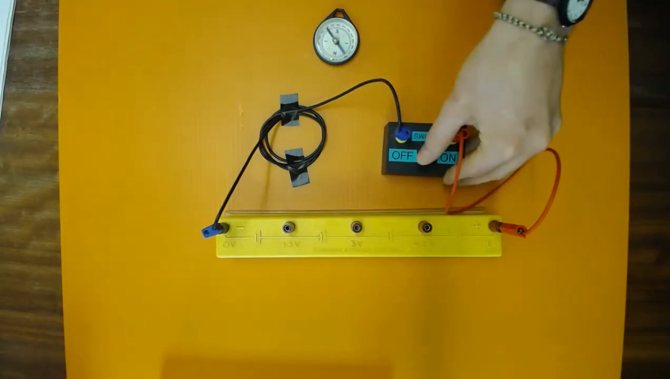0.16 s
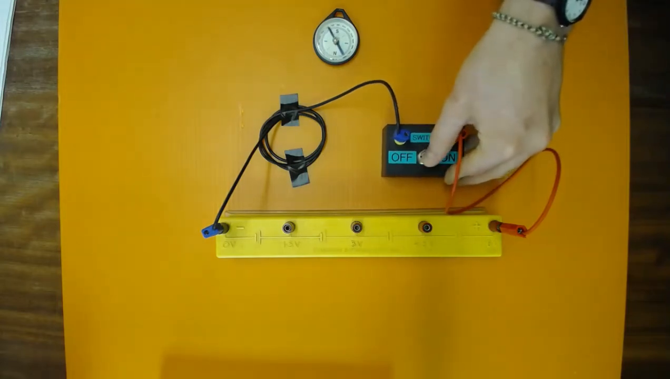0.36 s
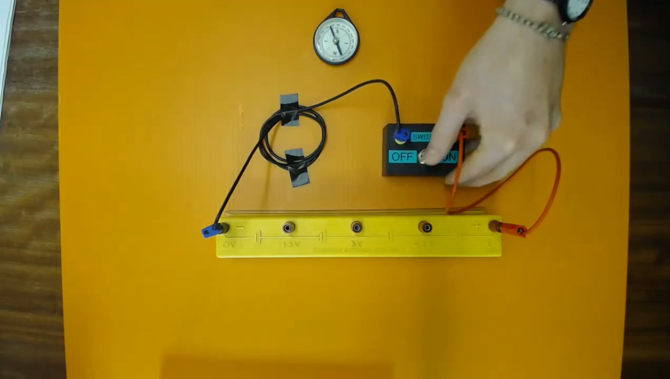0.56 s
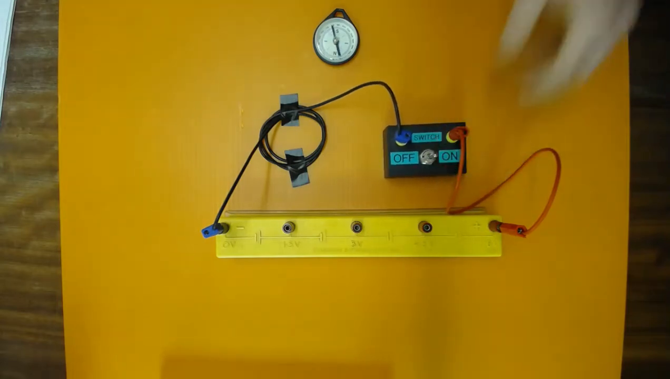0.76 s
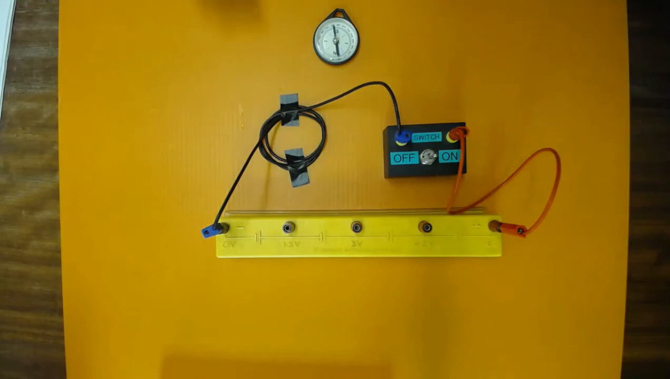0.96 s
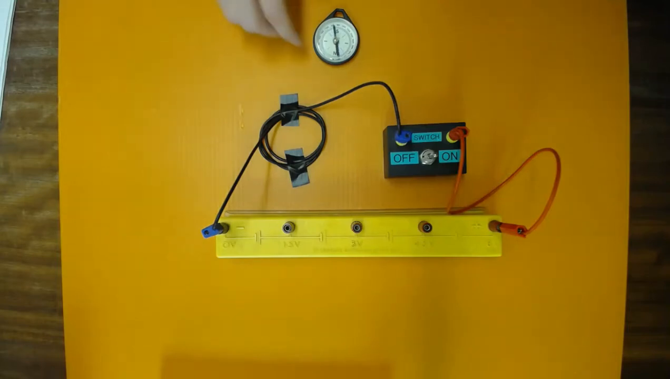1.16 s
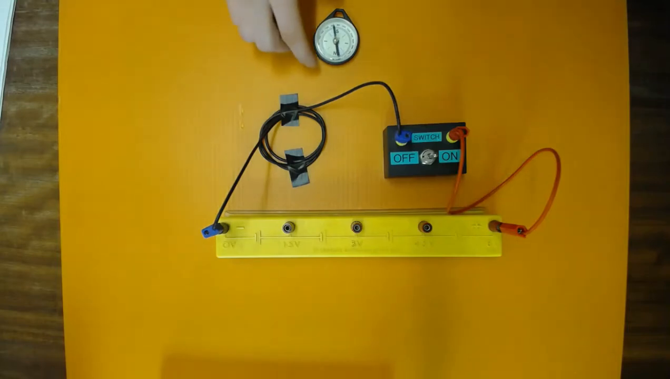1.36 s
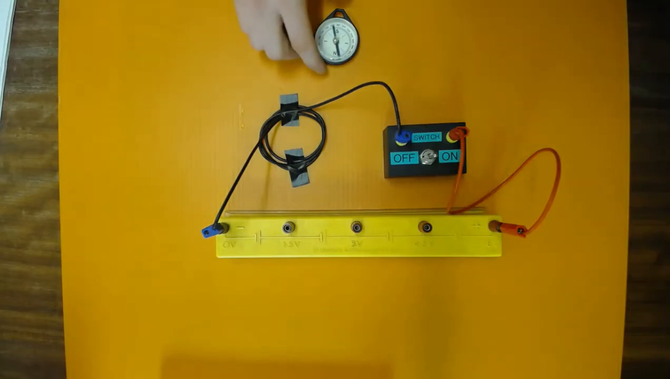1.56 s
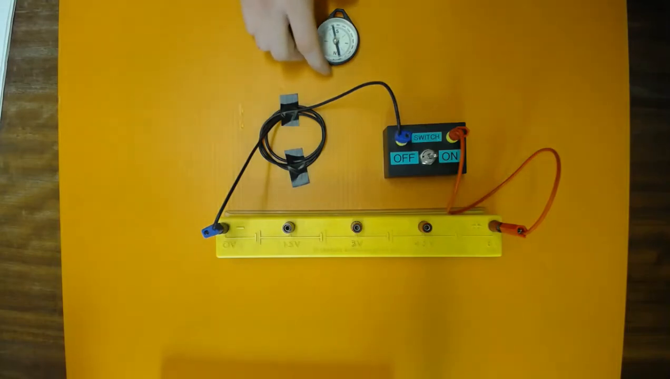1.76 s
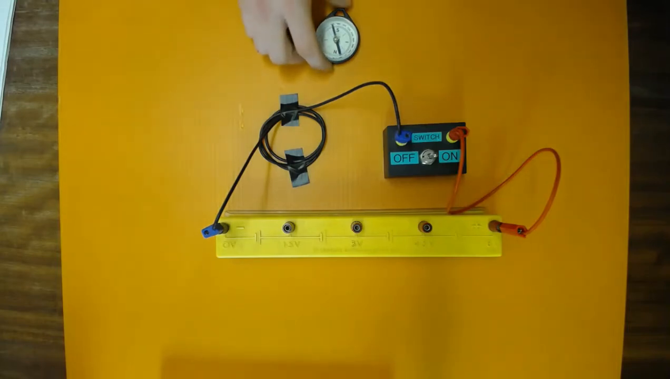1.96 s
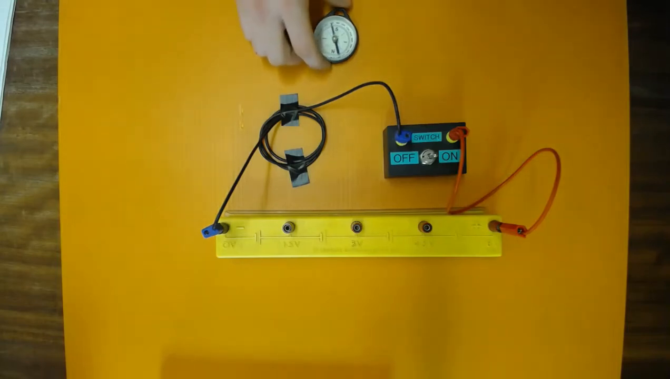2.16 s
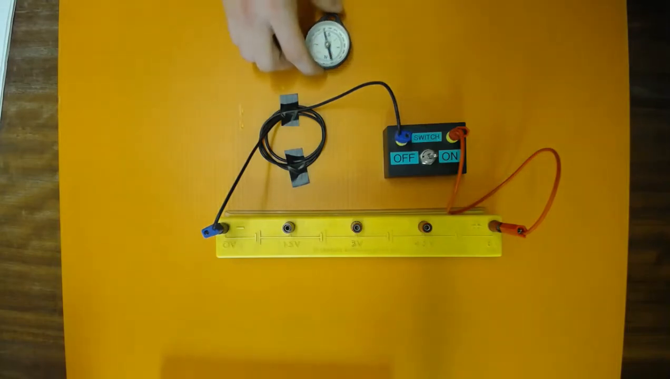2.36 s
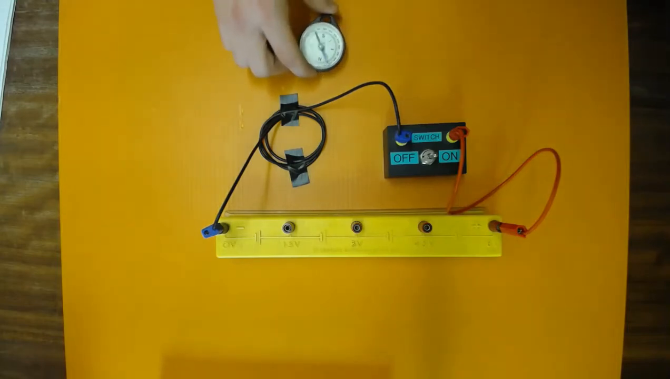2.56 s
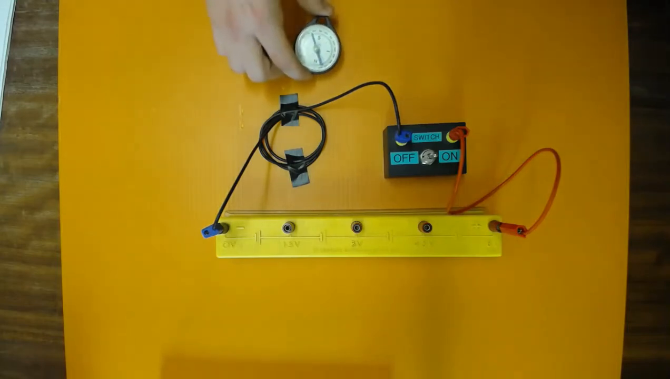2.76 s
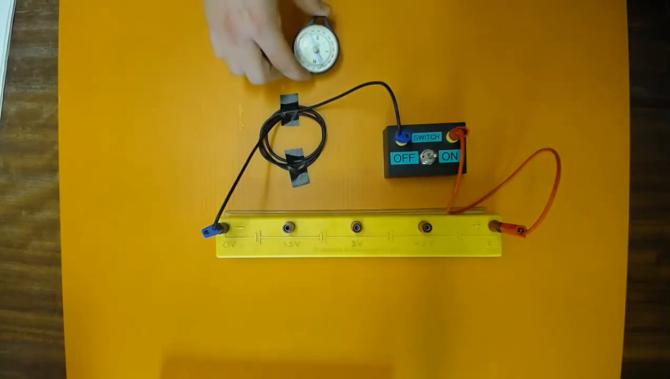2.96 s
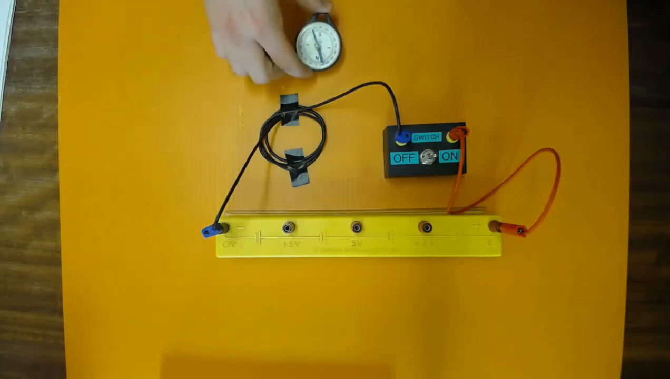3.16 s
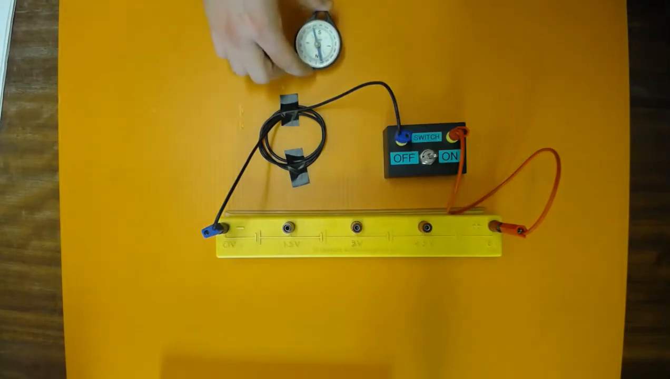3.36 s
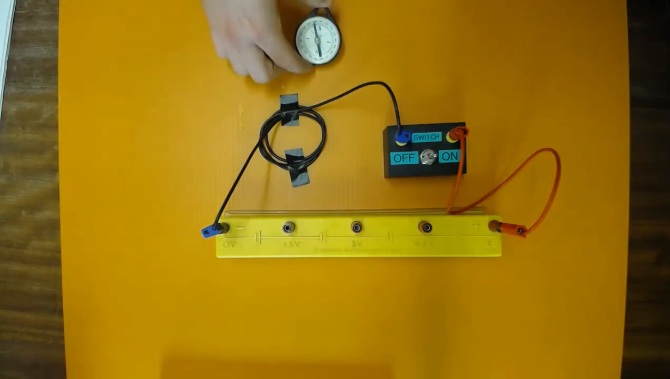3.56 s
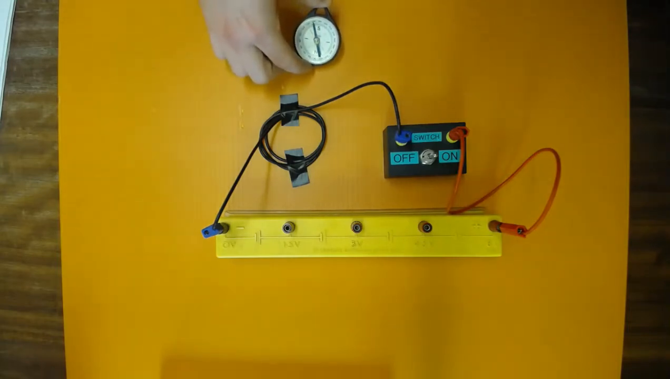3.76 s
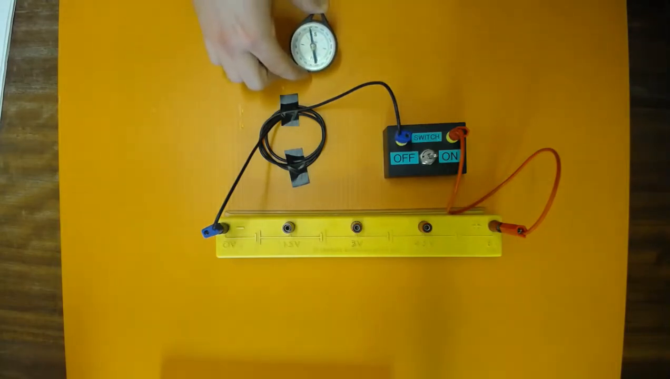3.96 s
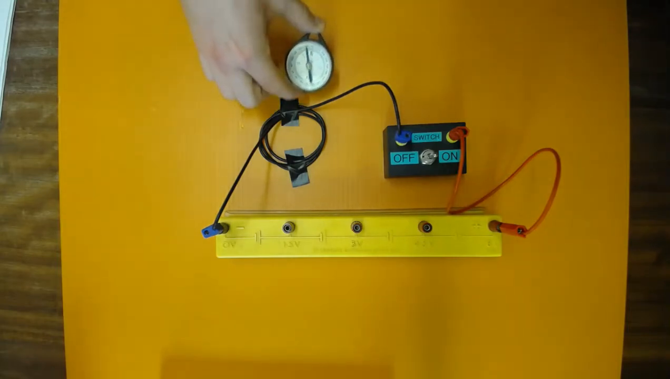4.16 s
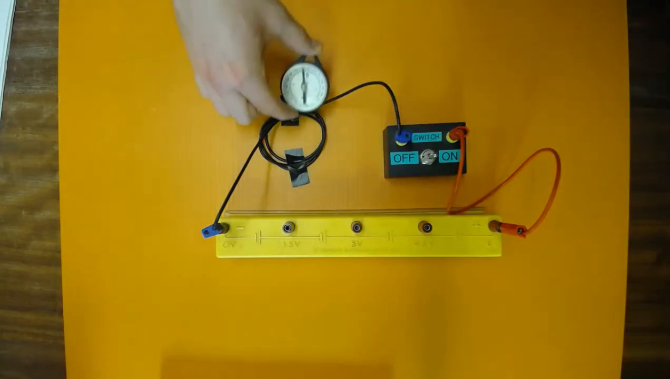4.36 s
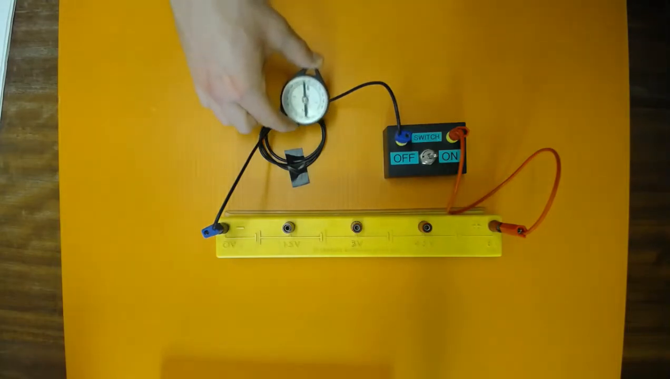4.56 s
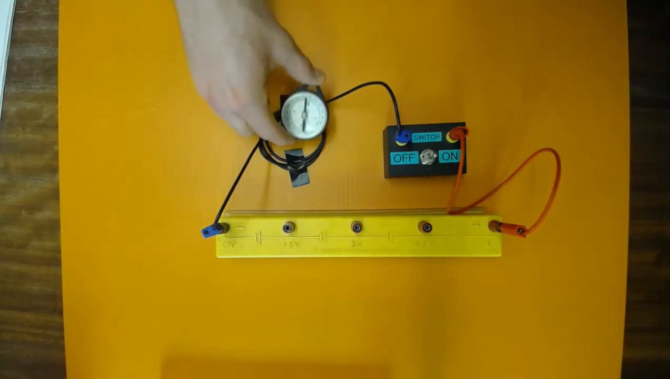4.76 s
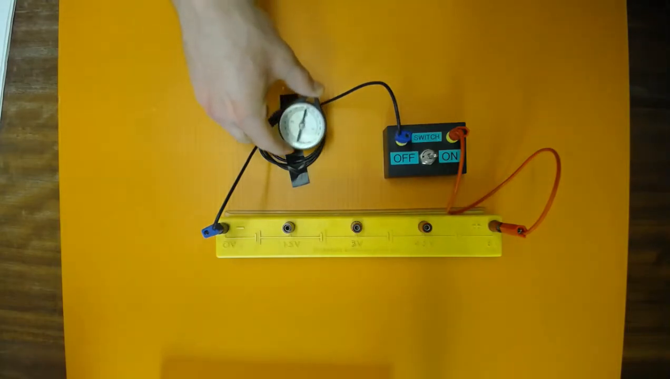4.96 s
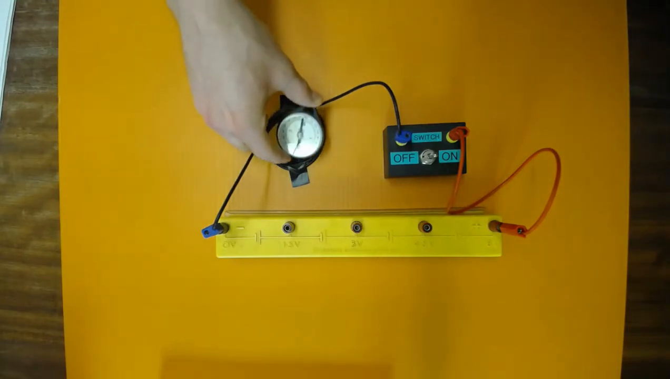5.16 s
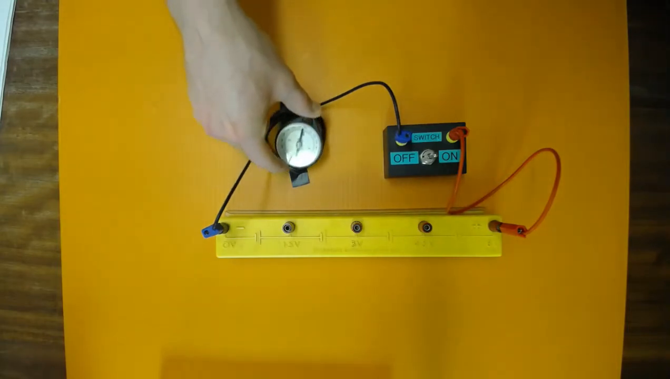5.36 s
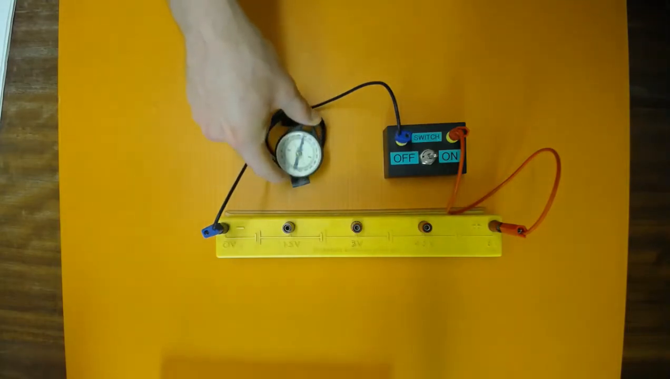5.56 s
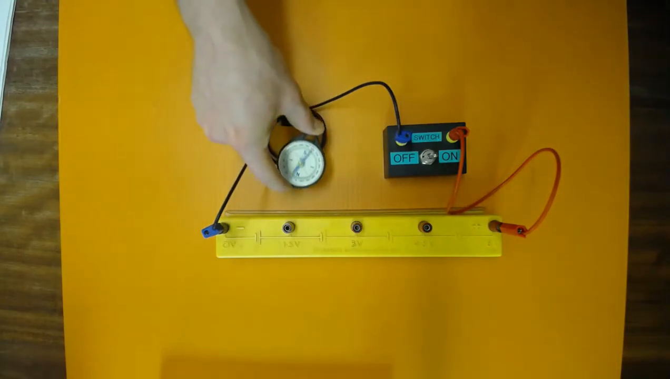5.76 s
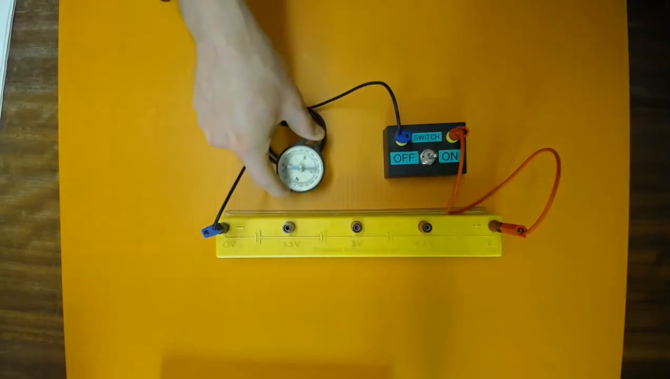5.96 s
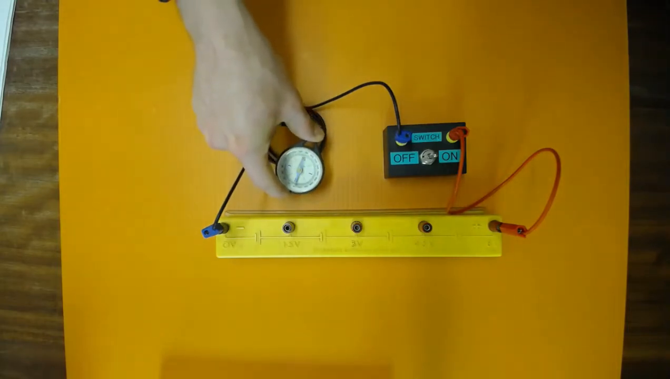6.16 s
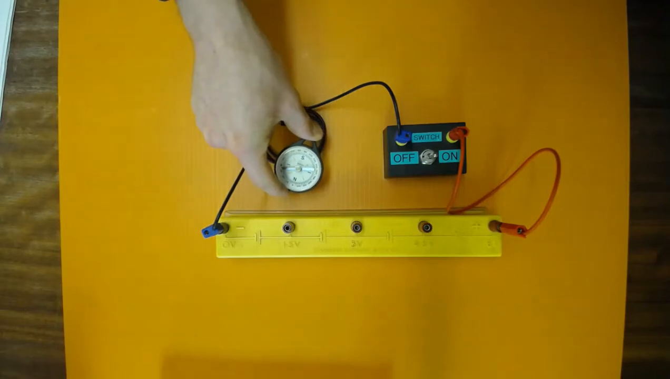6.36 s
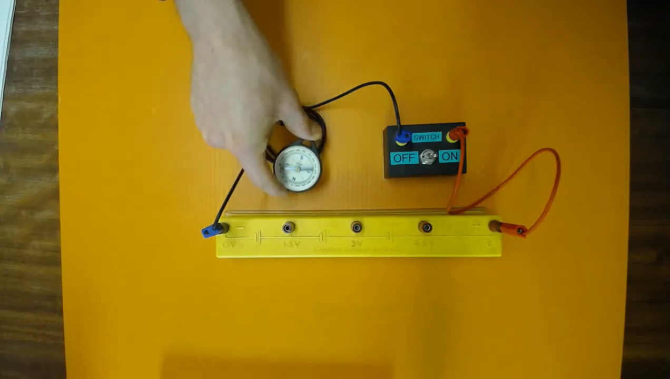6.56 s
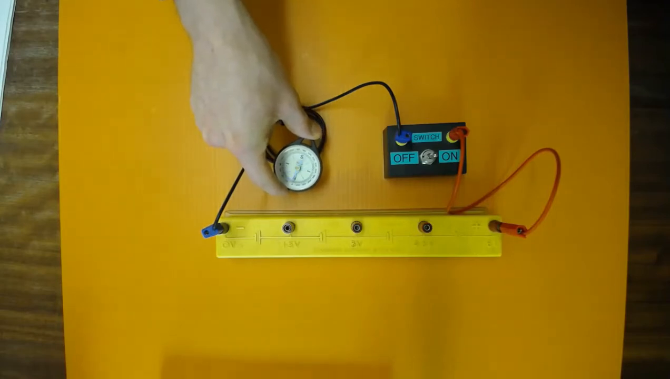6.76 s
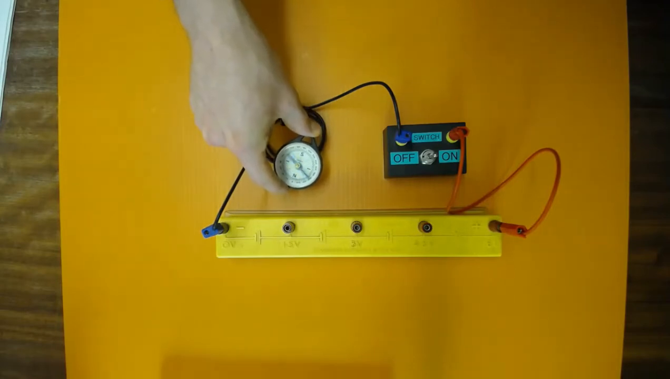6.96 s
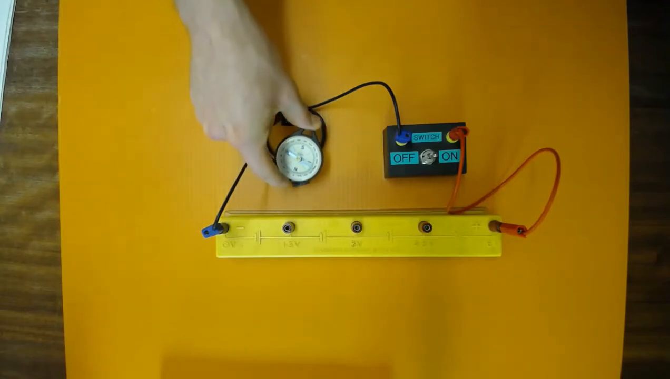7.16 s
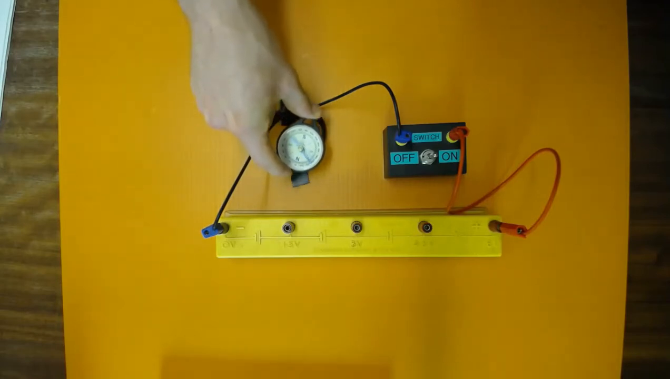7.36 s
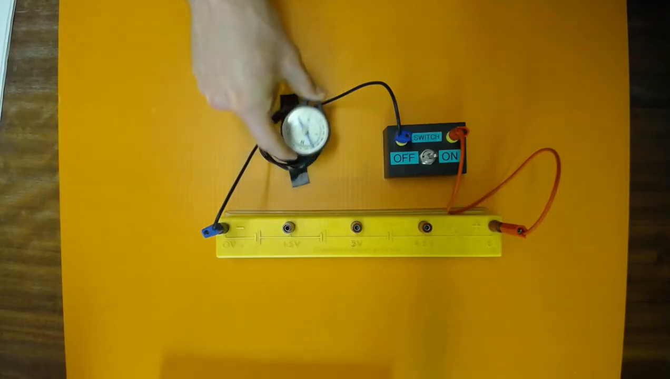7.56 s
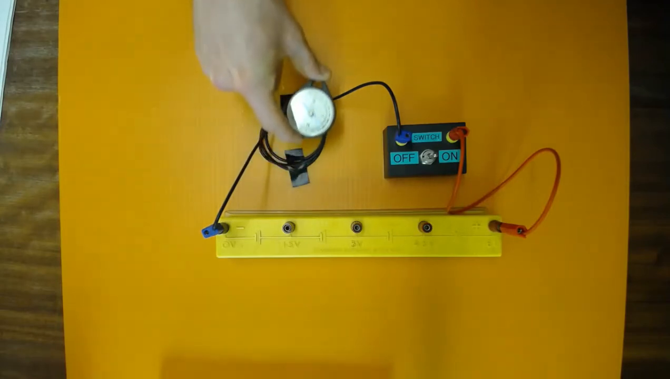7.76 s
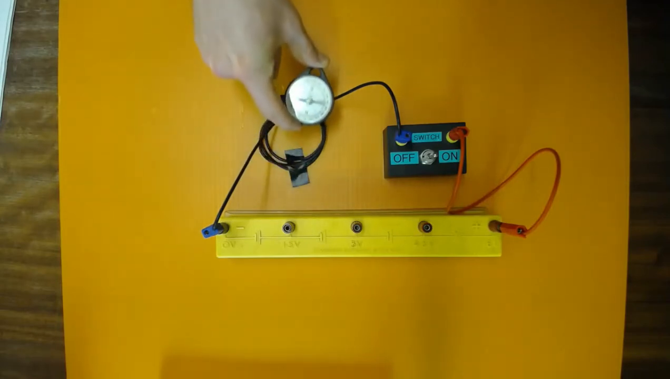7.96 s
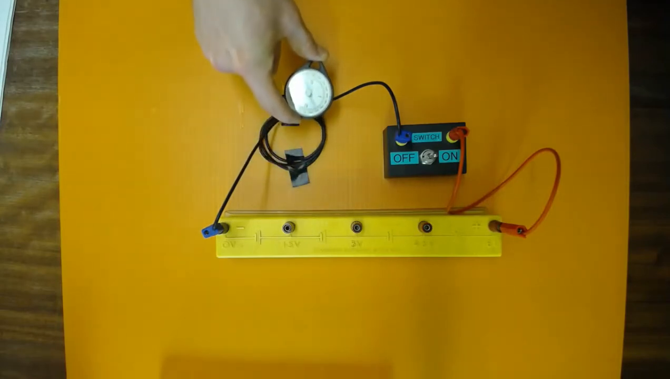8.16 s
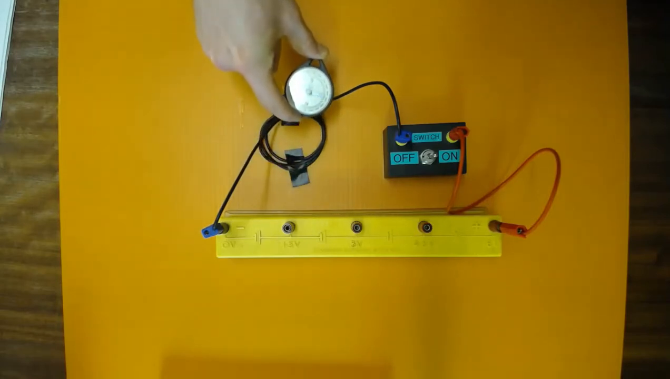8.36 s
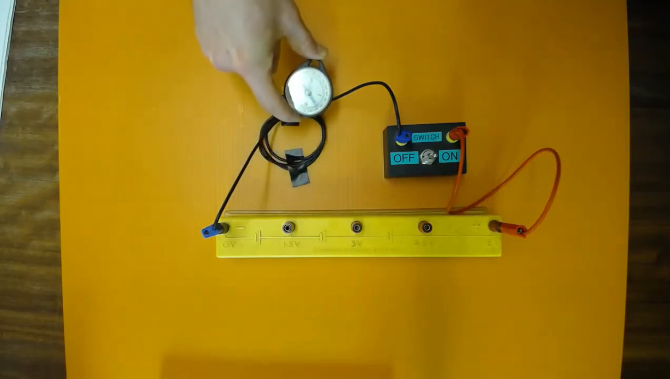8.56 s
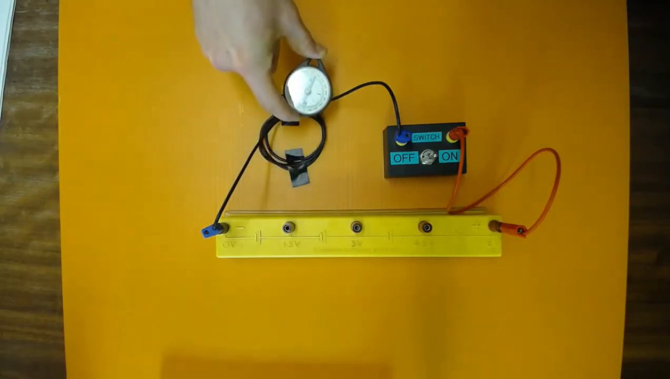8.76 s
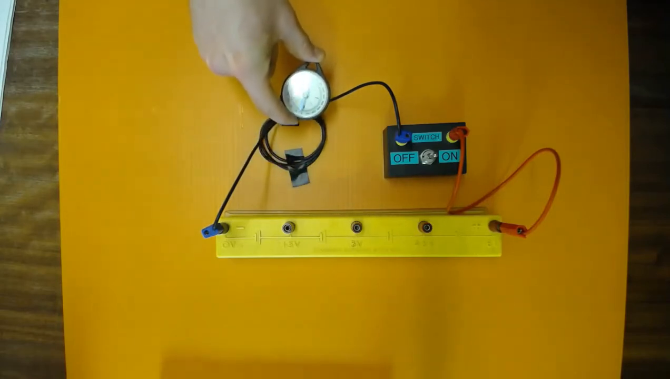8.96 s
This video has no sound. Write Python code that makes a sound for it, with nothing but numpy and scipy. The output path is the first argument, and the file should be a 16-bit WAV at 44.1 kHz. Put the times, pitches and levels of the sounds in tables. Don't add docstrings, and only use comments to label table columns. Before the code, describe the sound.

A plastic toggle switch snaps loudly on a table, then small, sparse metallic ticks from a handled compass over quiet fan hum and soft table thumps.

```python
import sys
import numpy as np
from scipy import signal
from scipy.fft import rfft, irfft, next_fast_len
from scipy.io import wavfile
from scipy.ndimage import map_coordinates

SR = 44100
rng = np.random.default_rng(int(sys.argv[2]) if len(sys.argv) > 2 else 0)


def int16_out(signal):
    q = np.round(np.clip(np.atleast_2d(signal).T, -1, 1) * 32767)
    wavfile.write(sys.argv[1], SR, q.astype(np.int16))


def boost_factor(decibels):
    exponent = np.asarray(decibels, float) / 20
    return 10 ** exponent


N = 397341

# (frequency [Hz], level [dB per Hz])
AIR = [(20, -12.5), (60, -15), (110, -12), (150, -14), (230, -17), (350, -14), (500, -13.5), (800, -15.5),
       (1100, -18), (1400, -20.5), (1700, -28.5), (3000, -34), (6000, -41.5), (16000, -51.5)]
# (frequency [Hz], width [Hz], level over the rush [dB])
DUCT = [(400, 30, -0.5), (680, 69.98, 10.5), (1015.5, 35, 7), (2065, 54, 8), (2871.5, 240, 4),
        (7400, 43, 6), (8170, 150, 4)]
# (frequency [Hz], likeness [-1 to 1])
AIR_LIKENESS = [(60, 0.81), (130, 1), (290, 0.75), (640, 0.91), (1410, 0.23), (3100, -0.37), (6820, -0.35),
                (15000, 0.0003)]
# (frequency [Hz], left over right [dB])
AIR_PAN = [(25, 0.82), (60, 2), (110, -3.5), (200, 5.5), (380, 1.5), (700, 1.5), (1290, 0), (2380, 2),
           (4400, 0), (8120, 3.5), (15000, -2)]
# (frequency [Hz], level [dB rms])
HUM = [(301, -73), (398, -78.5), (495, -78), (592, -81), (732, -79), (1012, -78.5)]
# (frequency [Hz], width [Hz], level [dB])
LENS = [(7500, 300, 0.0011), (8150, 400, 0.00014)]
# (time [s], level [dB], build-up [s])
SHOVES = [(.06, -58, 0.06), (.215, -59, 0.021), (.87, -66, 0.051), (.98, -61.5, 0.057), (1.17, -65, 0.07),
          (1.4, -67.5, 0.054), (1.6, -65.5, 0.042), (2.11, -64, 0.047), (2.24, -58.5, 0.033),
          (2.45, -56.5, 0.089), (2.75, -63, 0.088), (3.09, -68.5, 0.042), (3.55, -63, 0.075),
          (3.74, -68, 0.041), (3.96, -63, 0.02), (4.34, -60, 0.029), (4.52, -61, 0.064), (5.01, -57, 0.066),
          (5.34, -67, 0.082), (5.8, -57, 0.051), (6.03, -58, 0.094), (6.33, -63.5, 0.033),
          (6.65, -67, 0.049), (7.06, -63.5, 0.054), (7.45, -67, 0.11), (7.63, -65.5, 0.031),
          (8.28, -69, 0.057), (8.62, -71, 0.076), (8.92, -65, 0.028)]
# (frequency [Hz], t60 [s])
ROOM_T60 = [(200, 0.51), (1000, 0.91), (2300, 1), (3200, 1), (4800, 0.75), (6500, 0.74), (10000, 0.3),
            (15000, .3)]
# (frequency [Hz], level [dB])
ROOM_TOP = [(11800, 0), (12300, -25)]
# (frequency [Hz], level [dB])
SNAP_ECHO = [(100, -19.5), (500, -6.5), (1500, -1.5), (2300, -4.5), (2700, -5.5), (3100, 2), (3900, -7),
             (4800, 2.5), (5500, -7.5), (6300, -7.5), (8000, -10.5), (11800, -12), (12500, -19.5),
             (16000, -30)]
# (frequency [Hz], level [dB])
TICK_ECHO = [(2000, -5), (3200, 0.5), (3800, -3), (4400, 3), (5200, -4.5), (6070, 1), (7000, -6),
             (12000, -12)]
# (delay [s], frequency [Hz], width [Hz], level [dB])
WALLS = [
    (.042, 4400, 400, -25),
    (.054, 6050, 90, -23),
]
# (time [s], half length [s], level [dB], frequency [Hz])
RUBS = [
    (0.354, 0.011, -68, 2300),
    (0.354, 0.011, -74.5, 4798),
    (0.718, 0.017, -61, 1177),
    (1.004, 0.062, -82.5, 9900),
    (1.291, 0.36, -86, 5000),
    (1.862, 0.03, -84, 5940),
    (1.965, 0.047, -79, 6770),
    (2.408, 0.02, -76, 3300),
    (2.679, .003, -72, 7000),
]
# (time [s], table level [dB], box level [dB], half length [s])
ROCKS = [
    (0.438, -47.5, -59, 0.014),
    (0.564, -51, -62.5, 0.041),
    (0.645, -56.5, -56, 0.019),
    (0.724, -72, -76, 0.014),
]

# (frequency [Hz], width [Hz], level [dB])
CASE = [(3137, 126, 1.5), (3300, 300, -6.5)]
# (frequency [Hz], width [Hz], level [dB])
LID = [(3560, 320, -5), (4344, 134, 12), (5000, 200, 1.5), (5520, 330, -7)]
# (frequency [Hz], width [Hz], level [dB])
SNAP_LID = [(3580, 300, -3), (4390, 210, 10), (5000, 250, 4), (5556, 330, -6)]
# (frequency [Hz], width [Hz], level [dB])
NEEDLE = [(6060, 80, 27), (6175, 2100, 13), (6068, 14, 14)]
# (frequency [Hz], width [Hz], level [dB])
EDGE = [(7740, 806, 4), (8190, 45, 3), (9800, 1600, -20), (14200, 2400, -15)]
# (frequency [Hz], width [Hz], level [dB])
SNAP_EDGE = [(7605, 900, 0), (10400, 1500, -3), (12400, 900, -6), (14800, 1800, -2)]
# (frequency [Hz], width [Hz], level [dB])
RIM = [(2351, 340, -1.5), (3100, 170, -0.5)]
# (frequency [Hz], width [Hz], level [dB])
GRIP_CASE = [(3017, 240, -0.5)]
# (frequency [Hz], width [Hz], level [dB])
GRIP_LID = [(3530, 270, -4.5), (4010, 300, -2), (4400, 330, -4), (5000, 490, -13.5)]
# (frequency [Hz], width [Hz], level [dB])
LIFT_CASE = [(3050, 220, 0)]
# (frequency [Hz], width [Hz], level [dB])
LIFT_LID = [(3520, 220, -4.5), (4400, 260, 0.5), (5000, 400, -11)]
# (frequency [Hz], width [Hz], level [dB])
LIFT_RIM = [(2650, 260, 0)]
# (frequency [Hz], width [Hz], level [dB])
THUMB_CASE = [(3235, 130, 0)]
# (frequency [Hz], width [Hz], level [dB])
THUMB_CAP = [(5100, 700, 0), (4100, 500, -12)]
# (rim [dB], rim per lid share [dB/dB], rim per tip share [dB/dB], edge over tip [dB])
LID_SHARES = (-10.5, 0.37, 0, -3.5)
CASE_SHARES = (-0.59, .6, .3, .1)
GRIP_SHARES = (0, -0.12, 0.1, -13)
# (delay [ms], level [dB])
REBOUNDS = [
    (2.2, 1),
    (3.9, -5),
]
# (time [s], factor)
SQUEEZE = [(0, 0.96), (3.3, 1.01), (4.8, 1.03), (5.9, 1), (6.03, 0.85), (6.17, 0.91), (6.3, 0.98),
           (8.1, .99), (8.2, 0.99), (8.27, 1.03), (9, 0.98)]
# (time [s], left over right [dB])
COMPASS_PAN = [(0, 0), (2.3, 0.5), (3.4, -3.5), (4.2, 0.5), (5.6, -0.5), (6.2, 1), (7.1, 0), (8.1, 1.5),
               (9, 1)]
# (time [s], case peak [dB], cap share [dB], tip share [dB], edge over tip [dB])
THUMB = [
    (.043, -70, -20, -30, 0),
    (.1962, -86, 0, -3, 12),
    (.2028, -52.5, -19, -34, 8),
    (.2145, -64, -28, -45, 5),
]
# (time [s], case peak [dB], lid share [dB], tip share [dB], rim share [dB])
GRIPS = [
    (1.9747, -68, -4.5, -9, -7),
    (2.0094, -82, 0, -2.5, 0),
    (2.2857, -67.5, -12, -26, -7),
    (2.3763, -63.5, -5, -13, -9),
    (2.3845, -49, -1.5, -40, -0.5),
    (2.3885, -55, -4, -40, -7),
    (2.397, -66, -2, -40, -4),
    (2.405, -71, -3, -40, -4),
    (2.416, -71, -2, -40, -4),
]
# (time [s], case peak [dB], lid share [dB], tip share [dB], rim share [dB])
LIFTS = [
    (2.5298, -64.5, 1, -14, 2.5),
    (2.5775, -59, 11, -5, -3),
    (2.608, -76, 8, -6, 2),
    (2.6868, -67.5, 15.5, 3, 7.5),
    (2.701, -75, 4, -10, 6),
]
# (time [s], case peak [dB], lid share [dB], tip share [dB], edge over tip [dB])
LID_TICKS = [ (3.398, -71, -5, -14, -4), (3.412, -72, -2, -5, -4), (3.499, -73, 4, -3, 9),
             (3.197, -80, 6, -2, 6), (3.506, -70, -3, -10, 0), (3.6122, -61, 0, -11.5, -1),
             (3.7214, -72.5, 2, -7, 0), (3.832, -76, 7, -3, 0), (3.9374, -67, 2.5, -7.5, 0),
             (4.2836, -52, -2, -8, -10), (4.9312, -62.5, -5, -6, -1), (5.5356, -53.5, -2, -6, -6),
             (5.6513, -68, 4, -5.5, 5), (5.7453, -43, -1, -4.5, -6), (5.848, -78, 0, -4, 3),
             (6.037, -57.5, 6, -3, 7), (6.136, -82, -4, -2, 12), (6.2364, -71, -3, -11, 0),
             (6.3318, -61.5, -0.5, -4.5, -5), (6.575, -71, 5.5, 5, 2), (7.1192, -70.5, 9, 0, -2),
             (7.2355, -71, 3, 1.5, -6), (7.4644, -78.5, 2.5, -3, 0), (7.5777, -76.5, 2, -5, 0)]
# (time [s], case peak [dB], lid share [dB], tip share [dB], edge over tip [dB])
CASE_TICKS = [(4.1594, -64.5, -9, -4, -5.5), (4.5151, -62.5, -12, -9, -10), (4.6488, -59.5, -24, -20.5, 5),
              (4.7664, -55.5, -6, -11.5, -4.5), (4.7755, -52, -15, -25.5, 2),
              (4.8796, -44.5, -13, -19.5, 13), (4.8917, -57, -13, -18.5, 13), (4.9045, -65, -11.5, -19, 4),
              (5.0394, -43.5, -13.5, -19, 6), (5.0507, -56, -11.5, -18, 3), (5.548, -56, -10, -14, 0),
              (6.1506, -50, -9.5, -9, 4), (6.7424, -52, -22, -27, 9), (6.8937, -64, -18.5, -19, 8),
              (7.0004, -72, -9, -15, 5), (7.307, -76, -12, -9, 2), (7.394, -78, -25, -30, 0),
              (7.405, -73, -25, -30, 0), (7.417, -75, -25, -30, 0), (7.432, -73, -25, -30, 0),
              (8.0887, -60, -25, -13.5, -14), (8.096, -45.5, -27.5, -17.5, -9),
              (8.2082, -53, -21, -13.5, -4), (8.5824, -71, -16, -16, 6), (8.686, -65.5, -19, -22, 8)]
# (time [s], case peak [dB], lid share [dB], tip share [dB], edge over tip [dB])
SNAPS = [
    (3.064, -75, 9.5, -0.5, 5),
    (3.296, -76, 15, -1, 0),
    (3.1906, -71.5, 11, -4, 9),
    (3.3898, -65.5, 15, 0.5, 5),
    (3.492, -65, 13, -1, 4),
    (5.8364, -56.5, 2, 3, -5),
    (5.9364, -59, -4, -5.5, 1),
    (8.2706, -62, 0.5, 1, -2),
    (8.3722, -58.5, 0.5, 2, -5),
    (8.4796, -70, -4, 5, -2),
]
# (time [s], level [dB])
PIVOT = [
    (6.038, -71),
    (6.152, -66),
    (8.21, -79),
]

# (time [s], blow [dB], brightness [dB], chatter [ms])
LEVER = [
    (0.3798, -27, 1, .6),
    (0.3808, -14, 9, .8),
    (0.3813, -18.5, 12, .8),
    (.3827, -5, 0.5, .9),
    (.3840, 0, -4.5, .9),
    (0.3872, -8.5, -11.5, .9),
    (0.3916, -21, 6, 1.3),
    (0.3941, -16.5, -11.5, 1.5),
]
# (frequency [Hz], width [Hz], level [dB])
BOX = [(723, 100, -1), (993, 81, -14), (1368, 90, -18), (1641.5, 150, -15), (2084.4, 83, -20),
       (2380, 140, -16), (3090, 150, -13), (3300, 350, -14), (3700, 200, -16), (4690, 150, -20),
       (5080, 160, -16), (5500, 460, -15), (6240, 180, -12), (6900, 200, -15),
       (193, 94, -2), (275.4, 76, -4.5), (531, 42, -4), (2104.5, 700, -23.5), (5500, 2210, -24.5),
             (10400, 570, -12), (12710, 2500, -32), (15000, 900, -28), (11100, 320, -20.5),
             (9150, 280, -15.5)]
# (frequency [Hz], width [Hz], level [dB])
NOTCHES = [(590, 92, -9.5), (885, 110, -14), (2680, 400, -20), (4140, 240, -8)]
# (time [s], frequency [Hz], level [dB], t60 [s])
SHELL = [(.392, 282, -27, .09), (.3825, 992, -17, .032), (.382, 1372, -22, .025), (.3818, 6950, -23, .02),
         (.382, 2105, -15.5, .028), (.3813, 2390, -16, .024), (.381, 3085, -14, 0.027),
         (.3915, 3200, -27, 0.028), (.3815, 4640, -14.5, .022), (.381, 5020, -15, .016),
         (.387, 4720, -30, .03), (.3803, 11400, -33, .012), (.3803, 14100, -26, .008),
         (.3803, 15100, -35, .012)]
# (frequency [Hz], phase [rad])
BOX_LAG = [(200, .05), (700, .4), (1700, .7), (2400, .3), (3700, 1.3), (5600, .9), (7000, 1.6), (9100, 2.4),
           (11400, 2.5)]
# (frequency [Hz], left over right [dB])
BOX_PAN = [(350, .6), (800, 0), (1000, 7), (1370, -10), (1700, -2), (3700, -3), (4700, 2), (8000, -3),
           (13000, 3)]
# (frequency [Hz], level [dB])
TREBLE_TOP = [(15300, 0), (15800, -14), (16400, -34), (16600, -90)]


def unit(x):
    return x / np.sqrt(np.mean(x ** 2) + 1e-20)


def along(points, hz):
    f, v = np.transpose(points)
    return np.interp(np.log(hz + 1), np.log(f + 1), v)


def wobble(rate):
    knots = rng.standard_normal(int(N * rate / SR) + 4)
    return map_coordinates(knots, [np.arange(N) * rate / SR])


def swell(s, rise_s, fall_s):
    t = np.arange(N) / SR - s
    return np.exp(-(t / np.where(t < 0, rise_s, fall_s)) ** 2)


def filtered(x, response):
    n = x.shape[-1]
    m = 2 * next_fast_len(n // 2 + SR // 16)
    return irfft(rfft(x, m) * response(np.fft.rfftfreq(m, 1 / SR)), m)[..., :n]


def modes(table):
    def response(f):
        return sum((-1) ** k * boost_factor(db) * 1j * f * w / (c * c - f * f + 1j * f * w)
                   for k, (c, w, db) in enumerate(table))
    return response


def blended(table):
    def response(f):
        power = sum(abs(modes([mode])(f)) ** 2 for mode in table)
        cepstrum = irfft(np.log(power + 1e-12) / 2)
        cepstrum[1:len(f) - 1] *= 2
        cepstrum[len(f):] = 0
        return np.exp(rfft(cepstrum))
    return response


def highpass(f, hz):
    return (1j * f / hz / (1 + 1j * f / hz)) ** 2


def lowpass(f, hz):
    return 1 / (1 + 1j * f / hz) ** 2


def pair(response, likeness):
    def mid_side(f):
        turn = np.arccos(np.clip(along(likeness, f), -1, 1)) / 2
        return response(f) * np.array([np.cos(turn), np.sin(turn)])
    mid, side = filtered(rng.standard_normal((2, N)), mid_side)
    return np.array([mid + side, mid - side])


def air():
    def colour(f):
        duct_db = sum(db / (1 + (2 * (f - c) / w) ** 2) for c, w, db in DUCT)
        return boost_factor(along(AIR, f) + duct_db)
    rush = pair(colour, AIR_LIKENESS)
    rush = rush / np.std(filtered(rush[:, :3 * SR], lambda f: (f > 350) & (f < 1500)))
    stir_db = 6.5 * swell(.53, rise_s=0.15, fall_s=0.23)
    rush = boost_factor(-64.5 + stir_db + 0.55 * wobble(2.5)) * rush
    t = np.arange(N) / SR
    lines = sum(boost_factor(db + 3.5 + .7 * wobble(4.2)) * np.sin(2 * np.pi * hz * t + 0.24 * wobble(4))
                for hz, db in HUM)
    return filtered(rush + lines, lambda f: boost_factor(along(AIR_PAN, f) * np.array([[.5], [-.5]])))


def whine():
    frame_rate, first_s, life_ms = 30.02, .0095, 2.5
    since_ms = (np.arange(N) / SR - first_s) % (1 / frame_rate) * 1000
    bursts = np.exp(-since_ms / life_ms) * boost_factor(1.5 * wobble(12)) * pair(np.ones_like, [(8000, .3)])
    return boost_factor(-99) * unit(filtered(bursts, lambda f: modes(LENS)(f) ** 2))


def drum():
    top_hz, ring_s = 181.2, 0.043
    leg_modes = modes([(105, 70, 0)])
    top = lambda f: modes([(top_hz, 22, 0)])(f) ** 2 + modes([(105, 70, -16)])(f)
    pushes = sum(boost_factor(db) * swell(s, rise_s, ring_s) for s, db, rise_s in SHOVES)
    ring = np.sqrt(2) * np.sin(2 * np.pi * top_hz * np.arange(N) / SR + 1.6 * wobble(12))
    legs = boost_factor(-11.5) * unit(pair(leg_modes, [(180, 0.96)]))
    idle = boost_factor(-69.5) * unit(pair(top, [(180, 1.0)]))
    return boost_factor(np.array([[.6], [-.6]])) * (idle + pushes * (ring + legs))


def room(x, tone, dryness):
    hz, t, z = signal.stft(rng.standard_normal((2, SR)), SR, nperseg=256)
    start_db = along(tone, hz) + along(ROOM_TOP, hz)
    fall_db = 60 * dryness * t / along(ROOM_T60, hz)[:, None]
    tail = signal.istft(z * boost_factor(start_db[:, None] - fall_db), SR, nperseg=256)[1]
    tail = tail / np.linalg.norm(tail[0])
    answer = signal.oaconvolve(np.pad(x, (500, 0))[None], tail, axes=1)[:, :N]
    return np.pad(answer, ((0, 0), (0, N - answer.shape[1])))


def rubs():
    t = np.arange(3 * SR) / SR
    skin = np.zeros((2, len(t)))
    for s, half_s, db, hz in RUBS:
        band = modes([(hz, .9 * hz, 0)])
        brush = unit(filtered(rng.standard_normal((2, len(t))), lambda f: band(f) ** 2))
        skin += boost_factor(db) * np.exp(-((t - s) / half_s) ** 2) * brush
    return np.pad(skin, ((0, 0), (0, N - len(t)))) * boost_factor(3 * wobble(120))


def shudder():
    start_s, end_s = .4, 0.724
    t = np.arange(N) / SR
    gate = np.clip((t - start_s) / 0.0033, 0, 1) * np.clip((end_s - t) / 0.039, 0, 1)
    since = np.clip(t - start_s, 0, None)

    def settling(first_db, slow_db, slow_t60, column):
        fall = boost_factor(first_db - 60 * since / 0.09) + boost_factor(slow_db - 60 * since / slow_t60)
        return fall + sum(boost_factor(rock[column]) * swell(rock[0], rock[3], rock[3]) for rock in ROCKS)

    table_gain = settling(-36, -46, 0.63, column=1)
    box_gain = settling(-60, -52, 0.39, column=2)
    lumps = boost_factor(3.0 * wobble(37))
    soft = lambda f: 1 / (1 + (f / 1800) ** 4)
    table_modes = modes([(190, 50, -2), (285, 60, 0), (410, 50, -8)])
    box_modes = modes([(730, 90, 0), (970, 90, -3), (1370, 90, -7)])
    table = pair(lambda f: soft(f) * table_modes(f), [(300, 0.95)])
    box = pair(lambda f: soft(f) * box_modes(f), [(800, .85)])
    return gate * (table_gain * unit(lumps * table) + box_gain * unit(lumps * box))


def chatter(ms, rise_ms, count=1, spiky=2, rattle_db=-60, first_db=0, again=()):
    t = np.arange(SR // 20) / SR * 1000
    grit = rng.standard_normal((count, len(t)))
    late = np.exp(0.1203 * rng.standard_normal((count, 1)))
    fade = boost_factor(first_db) * np.exp(-t / ms) + boost_factor(rattle_db) * np.exp(-t / 7)
    for lag_ms, db in again:
        since = t - lag_ms * late
        fade = fade + boost_factor(db) * (since >= 0) * np.exp(-abs(since) / ms)
    burst = grit * abs(grit) ** spiky * (1 - np.exp(-(t + 0.027) / rise_ms)) * fade
    return burst / np.linalg.norm(burst, axis=1, keepdims=True)


def ticks(table, shares, case, lid, ms, rattle_db, own="edge", edge=EDGE, rim=RIM, again=REBOUNDS):
    out = np.zeros(N)
    times, peak_db, lid_db, tip_db, own_db = np.transpose(table)
    rim_db, per_lid, per_tip, edge_db = shares
    rim_db = rim_db + per_lid * lid_db + per_tip * tip_db + own_db * (own == "rim")
    edge_db = tip_db + edge_db + own_db * (own == "edge")
    skirts = lambda f: highpass(f, 2000) * lowpass(f, 11000)
    # (share dB, resonances, gain dB, first blow dB)
    parts = [(0, case, 17.03, -2), (rim_db, rim, 23.6, -4), (lid_db, lid, 21.55, 2.5),
             (tip_db, NEEDLE, 25, 7), (edge_db, edge, 18.2, 3.5)]
    for share_db, body, gain_db, first_db in parts:
        blows = chatter(ms, 0.1, len(times), 0.72, rattle_db, first_db, again)
        bend = np.interp(times, *np.transpose(SQUEEZE))[:, None] if body is case else 1
        blows = np.pad(blows, ((0, 0), (0, SR // 20)))
        rings = filtered(blows, lambda f: modes(body)(f / bend) * skirts(f))
        rings = rings / np.linalg.norm(rings, axis=1, keepdims=True)
        for s, db, ring in zip(times, peak_db + share_db + gain_db, rings):
            out[round((s - .0008) * SR):][:len(ring)] += boost_factor(db) * ring
    return out


def pivot():
    hz, t60 = 8200, 0.11
    out = np.zeros(N)
    for s, db in PIVOT:
        t = np.clip(np.arange(N) / SR - s, 0, None)
        out += boost_factor(db - 60 * t / t60) * np.sin(2 * np.pi * hz * t) * (1 - np.exp(-t / .001))
    return out


def compass():
    thumb = ticks(THUMB, LID_SHARES, THUMB_CASE, THUMB_CAP, ms=.3, rattle_db=-26, edge=SNAP_EDGE,
                  again=[(1.2, -12)])
    grips = ticks(GRIPS, GRIP_SHARES, GRIP_CASE, GRIP_LID, ms=0.45, rattle_db=-19, own="rim",
                  edge=SNAP_EDGE)
    lifts = ticks(LIFTS, GRIP_SHARES, LIFT_CASE, LIFT_LID, ms=0.35, rattle_db=-21, own="rim",
                  edge=SNAP_EDGE, rim=LIFT_RIM, again=[(1.7, -3)])
    on_lid = ticks(LID_TICKS, LID_SHARES, CASE, LID, ms=0.34, rattle_db=-27)
    snaps = ticks(SNAPS, LID_SHARES, CASE, SNAP_LID, ms=0.33, rattle_db=-18, edge=SNAP_EDGE,
                  again=[(1.6, -9)])
    on_floor = ticks(CASE_TICKS, CASE_SHARES, CASE, LID, ms=.45, rattle_db=-18,
                     again=[(2.1, 0.5), (3.9, -10)])
    return thumb + grips + lifts + on_lid + snaps + on_floor + pivot()


def shell():
    s, hz, db, t60 = np.transpose(SHELL)[:, :, None]
    t = np.clip(np.arange(SR) / SR - s, 0, None)
    rise = 1 - np.exp(-t / .0008)
    return np.sum(boost_factor(db - 60 * t / t60) * np.sin(2 * np.pi * hz * t) * rise, axis=0)


def switch():
    knocks, clicks = np.zeros((2, SR))
    for s, db, bright_db, ms in LEVER:
        start = round(s * SR)
        knocks[start] += boost_factor(db + 29.0)
        clicks[start:][:SR // 20] += boost_factor(db + bright_db + 30.0) * chatter(ms, rise_ms=.15, spiky=.4)[0]
    dull = filtered(knocks, lambda f: lowpass(f, 1100))
    sharp = filtered(clicks, lambda f: highpass(f, 1800) * lowpass(f, 9000))

    def radiation(f):
        notch = np.prod([1 - (1 - boost_factor(db)) * modes([(hz, width_hz, 0)])(f)
                         for hz, width_hz, db in NOTCHES], axis=0)
        return highpass(f, 130) * notch * blended(BOX)(f)

    return np.pad(filtered(dull + sharp, radiation) + shell(), (0, N - SR))


def scene():
    side = np.array([[.5], [-.5]])
    t = np.arange(N) / SR
    snap, taps = switch(), compass()
    near_snap = filtered(snap, lambda f: boost_factor(side * along(BOX_PAN, f)) * np.exp(-1j * side * along(BOX_LAG, f)))
    lag_s = 24.73e-6
    held = filtered(taps, lambda f: np.exp(-2j * np.pi * side * f * lag_s))
    near_taps = boost_factor(side * np.interp(t, *np.transpose(COMPASS_PAN))) * held
    slap = sum(np.roll(filtered(taps, modes([colour])), round(s * SR)) for s, *colour in WALLS)
    crack = np.arange(SR) == round(LEVER[1][0] * SR)
    walls = boost_factor(-12.5) * room(crack, SNAP_ECHO, 0.91) + boost_factor(-28.0) * room(taps, TICK_ECHO, 2.2) + slap
    around = walls + shudder() + rubs() + air() + drum() + whine()
    return near_snap + near_taps + filtered(around, lambda f: f < 15780)


def roll_off(x):
    return signal.sosfilt(signal.butter(12, 16460, fs=SR, output="sos"), x)


def record(dry):
    soft = dry / (1 + abs(dry / .7) ** 4) ** (1 / 4)
    limited = filtered(soft, lambda f: boost_factor(along(TREBLE_TOP, f)))
    return roll_off(limited)


dry = scene()
out = record(dry)
int16_out(out)
```